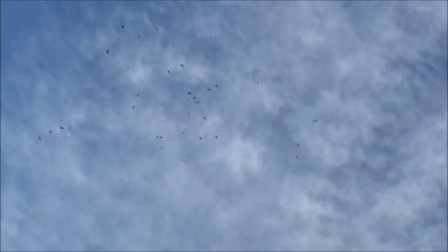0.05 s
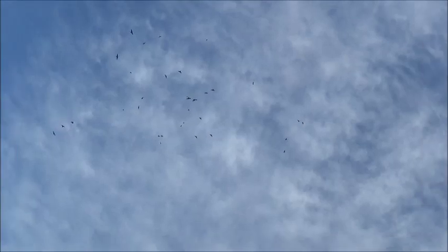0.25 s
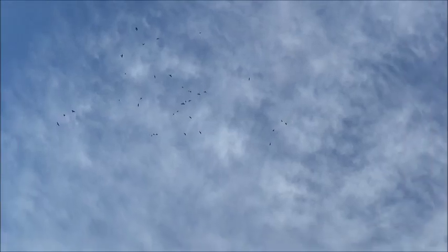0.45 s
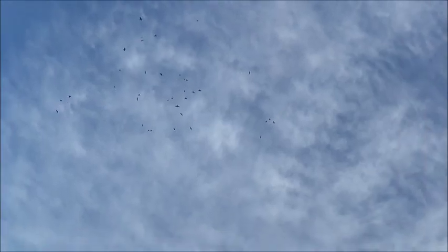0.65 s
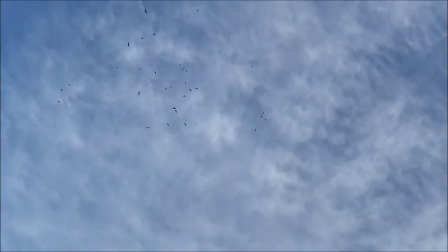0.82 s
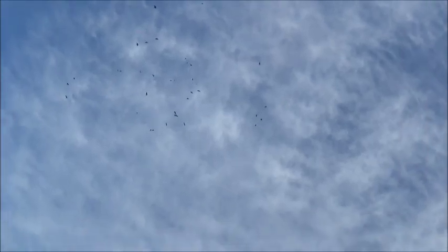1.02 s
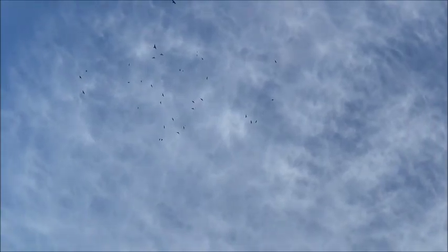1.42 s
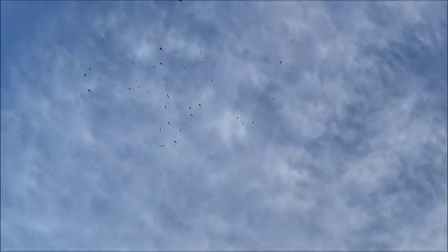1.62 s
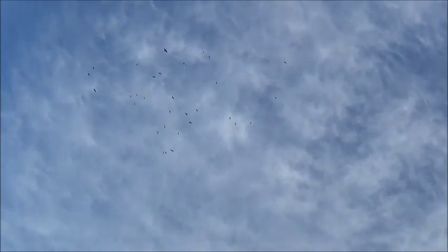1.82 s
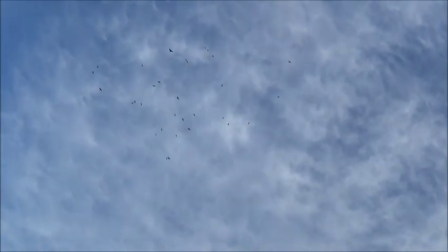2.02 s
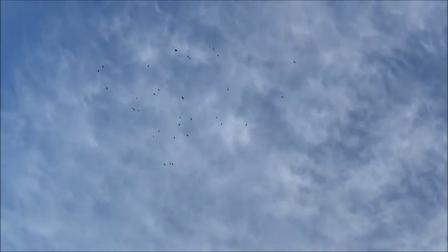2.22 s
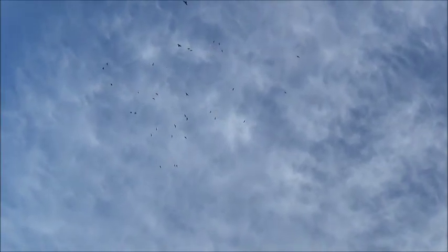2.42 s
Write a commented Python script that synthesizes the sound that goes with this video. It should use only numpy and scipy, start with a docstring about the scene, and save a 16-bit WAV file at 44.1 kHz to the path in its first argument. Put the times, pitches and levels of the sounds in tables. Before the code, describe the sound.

Ravens croak hoarsely overhead while wind gusts buffet the microphone.

```python
"""Wind buffets the microphone over a hiss and a thin camera whine, and a far raven trails off.
Three hoarse croaks follow overhead, each a quick run of throat bursts that start as clicks and fill
with voice. The gusts hit harder around a fourth croak; two dry ticks cut in along the way.
As the wind drops, a raven gives a soft knocking rattle, and a far croak ends the scene."""
import sys
import numpy as np
from scipy import signal
from scipy.fft import rfft, irfft, next_fast_len
from scipy.io import wavfile
from scipy.ndimage import map_coordinates

SR = 44100
rng = np.random.default_rng(int(sys.argv[2]) if len(sys.argv) > 2 else 0)


def to_wav(sig):
    """Store sig (one row per channel, or 1-D mono) as 16-bit WAV at the path in sys.argv[1].

    Samples outside -1..1 are clipped; the rate is SR.
    """
    pcm = np.clip(np.atleast_2d(sig), -1, 1) * 32767
    pcm = np.round(pcm).astype(np.int16)
    wavfile.write(sys.argv[1], SR, pcm.T)  # frames by channels


N = 112454
T = np.arange(N) / SR

# Raven calls, near and far. Each row: start in seconds, level in dB, first burst gap in seconds,
# gap growth per burst in seconds, length in seconds, base pitch in Hz, throat tuning as a ratio,
# roughness 0-1, swell in dB, number of bursts, flutter depth 0-1.
NEAR_CALLS = [(0.298, -39.5, 0.016, .0015, 0.21, 483.6, 0.953, .18, 3.5, 9, 0.79),
              (0.5289, -32, 0.013, .0022, 0.19, 486, 0.983, 0.16, 1, 8, 0.98),
              (0.813, -36, .0117, .0006, .17, 469, 0.932, 0.31, 2.5, 11, 0.48),
              (1.5074, -36, 0.016, .0018, 0.19, 473, 1.005, 0.19, 0.5, 8, .95)]
FAR_CALLS = [(.125, -47, .014, 0.0013, 0.13, 481, 1, 0.58, 0, 5, 0.99),
             (2.347, -49, .0145, 0.00022, 0.26, 440.6, 0.9, 0.32, 0.25, 14, 1)]
def ravens():
    """Hoarse croaks overhead and fainter ones far off."""
    out = np.zeros(N + SR)
    for start, db, *shape in NEAR_CALLS + FAR_CALLS:
        call = amp(db) * croak(*shape)
        out[round(start * SR):][:len(call)] += call
    return out[:N]


def croak(gap, growth, length, pitch, tuning, rough, swell_db, count, depth):
    """Throat bursts slow down as they fill with voice: each clicks open, buzzes, sags and shuts."""
    longest_gap_s, closed_s, voice_build_s, release_s = .0222, .0035, .068, .037
    sag_s, full_sag, burst_fade_db, rasp_db = .0145, .38, 7.5, 8
    n, k = SR // 3, np.arange(24)
    chance = rng.standard_normal((3, len(k), len(k)))
    air = rng.standard_normal(n)
    gaps = np.minimum(gap + growth * k, longest_gap_s)
    opens = np.append(0, np.cumsum(gaps))[:round(count)]
    spans = np.maximum(np.append(np.diff(opens) - depth * closed_s, length - opens[-1]), closed_s)
    sag = 1 - depth * full_sag * (1 - 1 / (1 + (k / pitch / sag_s) ** 3))  # pitch holds, then drops
    clicks, buzz = np.zeros(n), np.zeros(n)
    for start, span, jitter, uneven, drift in zip(opens, spans, *chance):
        progress = start / length
        hoarse = rough * (.5 + progress)
        effort = np.sin(np.pi * progress) - 1  # louder and higher in mid-call
        rise = .18 * (start - length / 2)
        hz = pitch * sag * (1 + .037 * effort + rise + .081 * hoarse * (jitter + drift[0]))
        age = np.cumsum(1 / hz) - 1 / hz[0]  # pulse times within the burst
        unfilled = max(1 - start / voice_build_s, 0)
        release = np.clip((length - start - age) / release_s, 0, 1)
        gate = np.clip((span - age) * pitch, 0, 1)
        level_db = 4 * effort + swell_db * progress + 3.9 * hoarse * uneven
        sizes = release * gate * amp(level_db - depth * burst_fade_db * age / span)
        clicks += pulses([start], sizes[:1] * amp(.5 * unfilled - .5), n)
        buzz += pulses(start + age[1:], sizes[1:] * amp(-9 * depth * unfilled), n)
    rasp = air * np.sqrt(np.abs(signal.lfilter([.02], [1, -.98], buzz ** 2)))  # breath rides the buzz
    clicks = filtered(clicks, lambda hz: amp(3.5 * hz ** 2 / (hz ** 2 + 3200 ** 2)))  # treble lift
    voice = filtered(clicks + buzz + amp(rasp_db) * rough * rasp, lambda hz: throat(hz / tuning))
    return unit(voice) * np.sqrt(length * SR / n)


# The raven's formants. Each row: centre in Hz, width in Hz, gain in dB.
FORMANTS = [(898, 87, -14.5), (1441, 207, 6), (1856, 298, 1), (2674, 160, -14.5), (3393, 200, -10),
            (4400, 690, -14), (5740, 1300, -17.5)]
# The voice's overall tone. Each row: frequency in Hz, gain in dB.
VOICE_EQ = [(300, -25), (800, 9), (1400, 4), (2000, 4.5), (2400, 6.5), (3200, 9), (6000, 1.5), (8000, 7),
            (15000, -20)]
def throat(hz):
    """The resonances of throat and open bill colour the voice."""
    ring = sum((-1) ** k * amp(db) * 1j * hz * width / (centre ** 2 - hz ** 2 + 1j * hz * width)
               for k, (centre, width, db) in enumerate(FORMANTS))
    return ring * amp(along(VOICE_EQ, hz))


# Throat knocks. Each row: start in seconds, level in dB.
RATTLE_KNOCKS = [(1.4699, -36), (2.1146, -41), (2.1535, -35.5), (2.1886, -32.5), (2.2255, -34),
                 (2.2614, -34), (2.2973, -32), (2.3350, -33)]
# The ring of a knock. Each row: frequency in Hz, gain in dB, seconds to fade by 60 dB.
KNOCK_RING = [(1296, 2.5, 0.014), (1800, 1, 0.0088), (2250, 0.5, 0.012), (3430, 2.5, 0.0041)]
def rattle():
    """The throat knocks once alone, later in a quick run, ringing a little differently each time."""
    out, t = np.zeros(N + SR), np.arange(SR // 20) / SR
    attack = 1 - np.exp(-t / .00097)
    for start, db in RATTLE_KNOCKS:
        ring = sum(amp(gain + rng.normal(0, 2.6) - 60 * t / t60) * np.sin(2 * np.pi * hz * t)
                   for hz, gain, t60 in KNOCK_RING)
        out[round(start * SR):][:len(t)] += amp(db) * ring * attack
    return out[:N]


# Fader moves for the three layers of wind. Each row: time in seconds, relative level in dB.
RUMBLE_FADER = [(0.2, -25.5), (0.23, -19), (0.34, -26.5), (0.36, -15), (0.38, -23), (0.54, -20),
                (0.57, -32), (0.64, -18), (0.68, -26.5), (0.83, -19.5), (0.92, -20), (0.94, -10.5),
                (0.99, -23), (1.06, -13.5), (1.09, -15), (1.11, -17.5), (1.19, -14), (1.2, -26.5),
                (1.32, -23), (1.34, -15), (1.47, -36.5), (1.49, -30), (1.57, -31.5), (1.64, -18),
                (1.66, -51), (1.72, -18), (1.81, -35), (1.84, -23), (1.88, -48), (1.93, -42), (1.96, -17),
                (2.03, -38), (2.05, -24), (2.08, -49), (2.15, -30.5), (2.21, -55.5), (2.31, -36),
                (2.36, -61), (2.42, -33.5), (2.45, -38), (2.49, -25.5), (2.55, -43.5)]
FLUTTER_FADER = [(0.2, -51), (0.22, -35), (0.45, -32.5), (0.49, -36), (0.53, -28.5), (0.55, -37),
                 (0.61, -42), (0.64, -31.5), (0.73, -40), (0.77, -34), (0.8, -35), (0.83, -27), (0.87, -57),
                 (0.92, -45), (0.94, -24), (1.04, -34), (1.06, -24), (1.11, -30), (1.13, -9.5), (1.15, -35),
                 (1.17, -16.5), (1.19, -24), (1.3, -24.5), (1.32, -19.5), (1.49, -53), (1.6, -47),
                 (1.61, -21), (1.68, -28), (1.71, -16.5), (1.87, -37.5), (1.89, -39.5), (1.95, -26),
                 (2.02, -50), (2.3, -68), (2.47, -49), (2.55, -55)]
BODY_FADER = [(0.2, -45), (0.23, -27.5), (0.38, -21), (0.4, -31.5), (0.45, -12.5), (0.49, -33), (0.53, -16),
              (0.61, -34), (0.65, -18.5), (0.7, -32.5), (0.77, -16), (0.81, -18), (0.92, -28.5),
              (0.94, -17.5), (1.04, -21), (1.05, -19), (1.1, -23.5), (1.12, -13), (1.19, -18.5),
              (1.25, -14), (1.27, -15), (1.38, -21), (1.48, -45), (1.53, -32.5), (1.59, -47.5),
              (1.62, -16.5), (1.63, -10), (1.65, -23.5), (1.72, -12.5), (1.81, -24.5), (1.85, -18),
              (1.89, -48), (1.96, -22), (2.08, -47.5), (2.1, -64), (2.16, -41), (2.21, -71), (2.29, -44),
              (2.32, -65), (2.4, -60), (2.46, -29.5), (2.55, -62)]
# The tone of each layer. Each row: frequency in Hz, gain in dB.
RUMBLE_EQ = [(12, -33), (25, -11.5), (50, -3), (90, 4.5), (125, -4.5), (160, -17), (300, -31), (800, -100)]
FLUTTER_EQ = [(150, 8), (300, -5.5), (450, -2.5), (650, -12.5), (900, -22), (1300, -41.5), (2500, -60),
              (6000, -54.5)]
BODY_EQ = [(70, -61), (115, -5.5), (145, 1), (215, -3.5), (280, -8.5), (350, -15), (800, -41), (2000, -110)]
def wind():
    """Gusts on the microphone ports: a deep rumble, a hollow body and a flutter above them."""
    rumble = fader(RUMBLE_FADER, trim_db=-.5) * eddies(RUMBLE_EQ, spread=.17, even_s=.11)
    flicker = amp(4.5 * wobble(70))
    flutter = fader(FLUTTER_FADER, trim_db=1.5) * flicker * eddies(FLUTTER_EQ, spread=.39, even_s=.0083)
    body = fader(BODY_FADER) * eddies(BODY_EQ, spread=.21, even_s=.09)
    return rumble + body + flutter


# The wind's lead at the left port. Each row: frequency in Hz, phase lead in radians.
LEFT_LEAD = [(40, 0.23), (120, 0.79), (250, 1.38), (450, 1.97), (800, 2.29), (1500, 1.5)]
def eddies(eq, spread, even_s):
    """Turbulence of even strength that reaches the left port first."""
    shared, side = filtered(rng.standard_normal((2, N)), lambda hz: amp(along(eq, hz)))
    pair = np.array([shared + spread * side, shared - spread * side])
    pair = filtered(pair, lambda hz: np.exp(.5j * along(LEFT_LEAD, hz) * np.array([[1], [-1]])))
    power = np.mean(pair ** 2, 0) + pair.mean(0) ** 2
    power = filtered(power, lambda hz: np.exp(-(hz * even_s) ** 2))  # smoothed over time
    pair = pair / np.sqrt(np.abs(power) + .024 * power.mean())
    return pair / pair.mean(0).std()


# Sharp wind hits. Each row: time in seconds, level in dB, edge width in seconds.
WIND_HITS = [(0.7674, -17.5, 0.00076), (1.127, -12.5, 0.00034), (1.164, -15, .0008), (1.321, -11, 0.00069),
             (1.3411, -13.5, 0.00062), (1.7202, -5, 0.00086), (1.7318, -14, 0.00066), (1.78, -15, 0.00073)]
def buffets():
    """The hardest eddies hit as single pressure jumps."""
    return sum(amp(db) * np.tanh(2 * (T - at) / width) * np.exp(-((T - at) / .0011) ** 2)
               for at, db, width in WIND_HITS)


# Dry ticks. Each row: time in seconds, relative level in dB.
DRY_TICKS = [(0.56, -24), (1.508, -25.5)]
# Their tone. Each row: frequency in Hz, gain in dB.
TICK_EQ = [(500, -23), (1400, -14), (3000, -8), (4800, 5), (6000, -16), (15000, -18)]
def ticks():
    """Two short, bright spikes of noise."""
    envelope = sum(amp(db - 60 * np.abs(T - at) / .006) for at, db in DRY_TICKS)
    noise = filtered(rng.standard_normal(N), lambda hz: amp(along(TICK_EQ, hz)))
    return .5 * envelope * unit(noise)


def ground_scatter(x, t60_s=.15):
    """The ground scatters the calls into a short stereo tail."""
    t = np.arange(SR // 2) / SR
    tail = rng.standard_normal((2, len(t))) * amp(-60 * t / t60_s)
    return signal.fftconvolve(x[None], tail / np.linalg.norm(tail[0]), axes=1)[:, :N]


# One fader for hiss and whine. Each row: time in seconds, relative level in dB.
BED_FADER = [(.22, -47.5), (.65, -45.5), (1.04, -43.5), (1.3, -47.5), (1.42, -49.5), (1.485, -50),
             (1.505, -40), (1.53, -47), (1.7, -49.5), (2.55, -48.5)]
# The tone of the hiss. Each row: frequency in Hz, gain in dB.
HISS_EQ = [(200, 16), (700, 10), (1200, 10), (1700, 6.5), (2300, 6.5), (3200, 3.5), (4400, 4), (5250, 1),
           (7500, 0), (10800, 3.5), (13000, -0.5), (15500, -3.5)]
# Its stereo width. Each row: frequency in Hz, angle from mid towards side in radians.
HISS_WIDTH = [(200, 0.3), (1000, 0.86), (3000, 0.69), (7500, 0.49), (10000, 0.42), (12000, 0.045),
              (15000, .08)]
def hiss_and_whine(hiss_db=3, whine_db=-13, whine_hz=15734):
    """A bed of broad hiss with the camera's thin whine on top."""
    def colour(hz):
        angle = along(HISS_WIDTH, hz)
        return amp(along(HISS_EQ, hz)) * [np.cos(angle), np.sin(angle)]
    mid, side = filtered(rng.standard_normal((2, N)), colour)
    hiss = unit(np.array([mid + side, mid - side]))
    whine = np.sqrt(2) * np.sin(2 * np.pi * whine_hz * T)
    return fader(BED_FADER) * (amp(hiss_db) * hiss + amp(whine_db) * whine)


def shimmer(centre_hz=4730, width_hz=280, wander_hz=92.9, level_db=-57.5):
    """A faint high band in the hiss wavers and flickers."""
    band = filtered(rng.standard_normal((2, N)), lambda hz: np.exp(-((hz - centre_hz) / width_hz) ** 2))
    wander = np.exp(2j * np.pi * np.cumsum(wander_hz * wobble(30)) / SR)
    mid, side = (signal.hilbert(band) * wander).real * amp(2.2 * wobble(35))
    return amp(level_db) * unit(np.array([mid + .41 * side, mid - .59 * side]))


def amp(db):
    """Decibels to gain."""
    return 10 ** (np.asarray(db) / 20)


def unit(x):
    """Scale to rms 1."""
    return x / np.sqrt(np.mean(x ** 2) + 1e-20)


def along(points, hz):
    """Read (Hz, value) points on a log frequency axis."""
    freqs, values = np.transpose(points)
    return np.interp(np.log(hz + 1), np.log(freqs + 1), values)


def fader(points, trim_db=0):
    """A gain per sample from (seconds, dB) points."""
    times, db = np.transpose(points)
    return amp(np.interp(T, times, db) + trim_db)


def wobble(rate):
    """A smooth random curve, rate knots a second."""
    return map_coordinates(rng.standard_normal(1024), [T * rate], mode="mirror")


def filtered(x, response):
    """Shape x with a complex frequency response."""
    n = x.shape[-1]
    m = next_fast_len(n + 8192)
    return irfft(rfft(x, m) * response(np.fft.rfftfreq(m, 1 / SR)), m)[..., :n]


def pulses(times, sizes, n):
    """Impulses placed between samples."""
    at = np.asarray(times)[:, None] * SR
    taps = np.floor(at) + np.arange(-7, 9)
    weights = np.sinc(taps - at) * np.sinc((taps - at) / 8) * np.asarray(sizes)[:, None]
    return np.bincount(np.clip(taps, 0, n).astype(int).ravel(), weights.ravel(), n + 1)[:n]


def scene():
    """Birds slightly to the left, wind and hiss all round."""
    birds = ravens() + rattle()
    panned = birds * amp([[1], [-1]])
    echo = amp(-15) * ground_scatter(birds)
    return panned + echo + ticks() + wind() + buffets() + hiss_and_whine() + shimmer()


def record(dry):
    """The microphone opens, overloads softly at full scale and keeps nothing above its band limit."""
    open_s, fade_s, top_hz = .2014, .018, 15950
    x = dry * np.clip((T - open_s) / fade_s, 0, 1)
    x = x / (1 + x ** 8) ** (1 / 8)
    return filtered(x, lambda hz: hz < top_hz)


dry = scene()
out = record(dry)
to_wav(out)
```